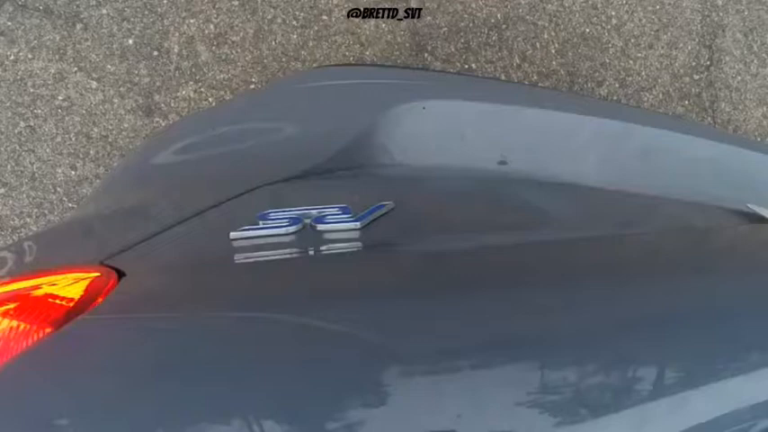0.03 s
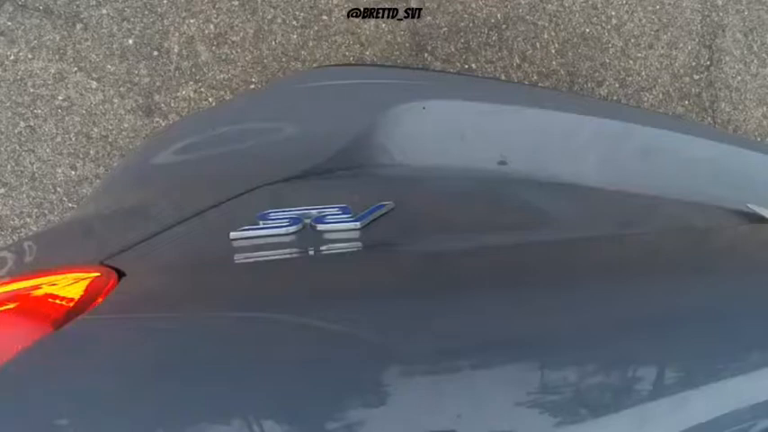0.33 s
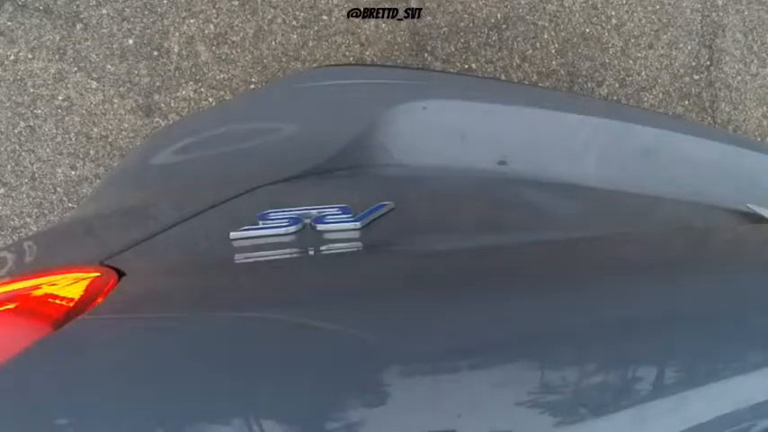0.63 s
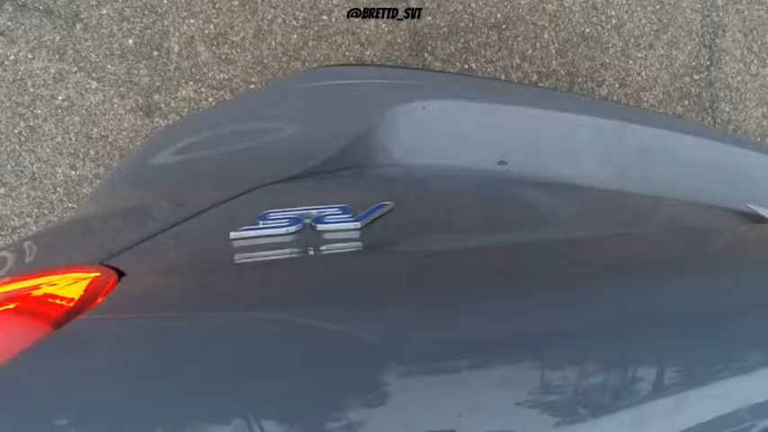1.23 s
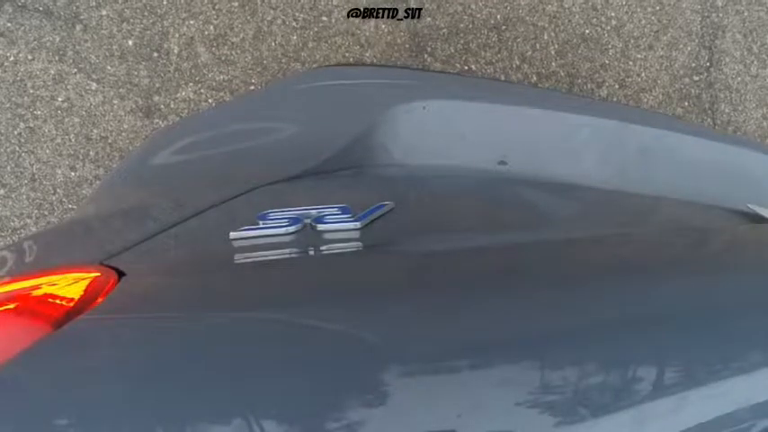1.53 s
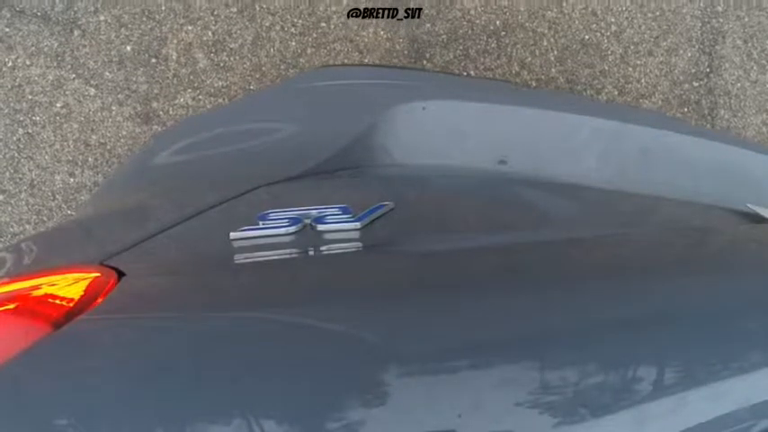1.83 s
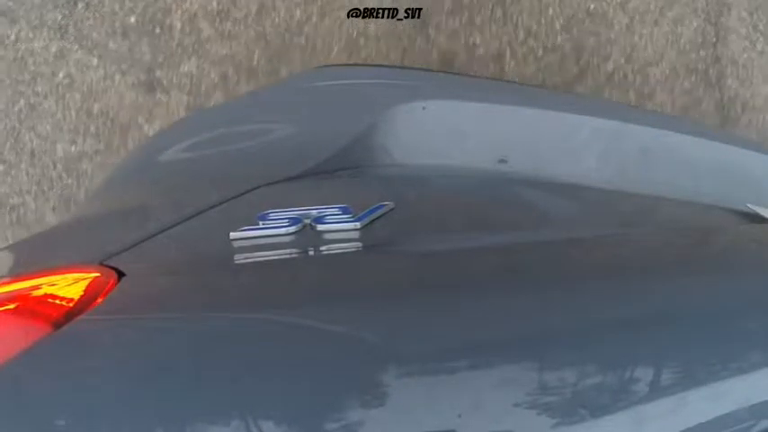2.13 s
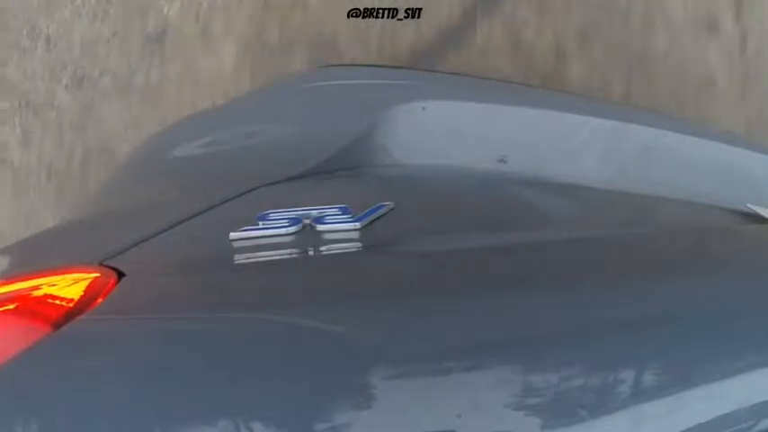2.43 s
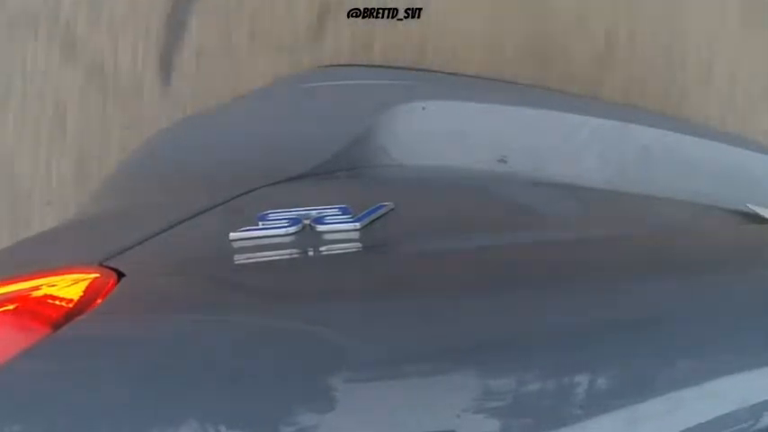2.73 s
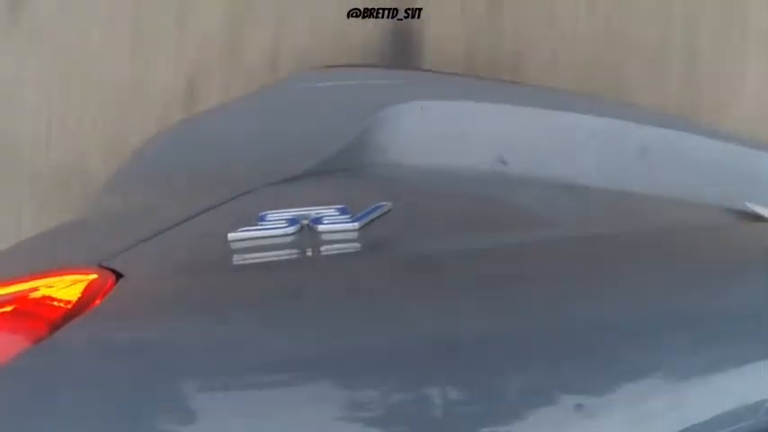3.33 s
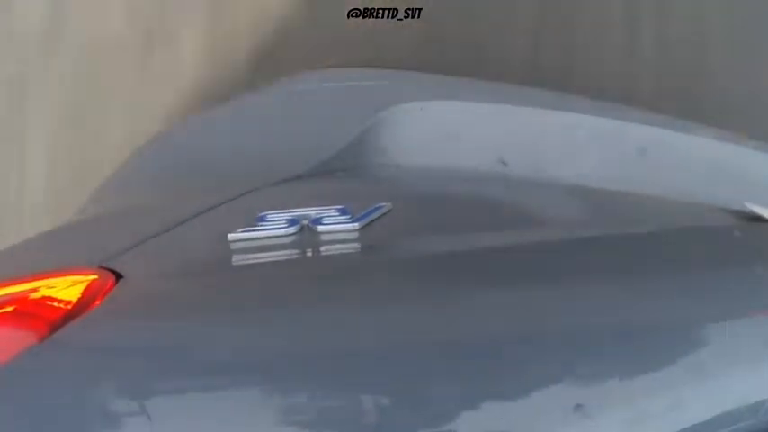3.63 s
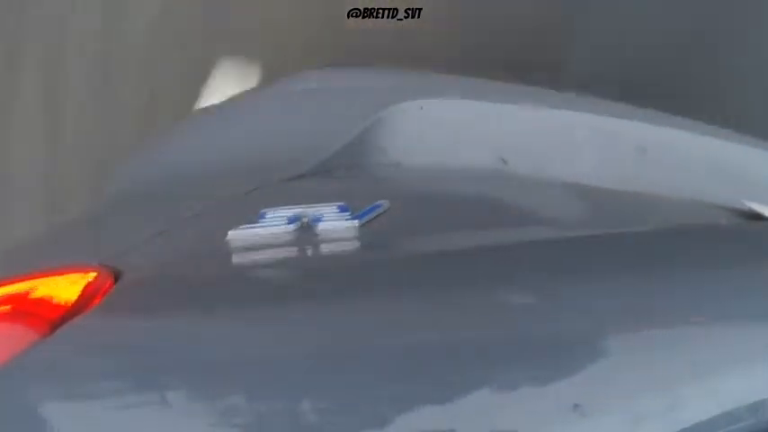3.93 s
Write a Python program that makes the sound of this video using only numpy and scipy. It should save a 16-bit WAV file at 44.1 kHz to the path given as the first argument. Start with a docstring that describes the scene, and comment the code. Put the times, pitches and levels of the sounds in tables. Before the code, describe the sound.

A sports car's V8 idles with a lumpy rumble and a faint whirr. Two throttle blips and a loud exhaust pop follow, then the car pulls away with a rising drone. The microphone rides just above the exhaust.

```python
"""A lumpy V8 idle, close up: the microphone rides on a sports car's rear wing, just above the exhaust.
Two throttle blips and a pop follow, then the clutch bites, the revs sag and the car pulls away over grit.
Each beat of the near cylinder bank pushes a deep boom out of the pipe and, under throttle, rings it
with a bark. Gas rasps and hisses, unburnt fuel pops, and behind it all the engine bay whirrs at idle.
Thin overload ticks stand for the loudest beats clipping the microphone."""
import sys
import numpy as np
from scipy import signal
from scipy.fft import rfft, irfft
from scipy.io import wavfile
from scipy.ndimage import uniform_filter1d, minimum_filter1d

SR = 44100
rng = np.random.default_rng(int(sys.argv[2]) if len(sys.argv) > 2 else 0)


def store_pcm(level_fs):
    """Save levels as 16-bit WAV."""
    pcm = np.round(np.clip(level_fs, -1, 1) * 32767).astype(np.int16)
    wavfile.write(sys.argv[1], SR, np.atleast_2d(pcm).T)


N = 176400

# engine speed as the beat rate of the bank nearest the microphone: t/s, rate/Hz
BEAT_RATE = [(0.0, 20.86), (0.3, 28.3), (0.88, 29.46), (1.07, 45.65), (1.15, 58.07), (1.29, 47.7),
             (1.46, 81.4), (1.68, 74.84), (1.86, 64.82), (1.99, 78.52), (2.1, 72.46), (2.28, 77.44),
             (2.52, 72.88), (2.87, 53.96), (3.22, 81.79), (3.46, 94.56), (3.82, 126.5), (4.0, 143.49)]
# whirr of the engine bay, pump whine, grit under the tyres: t/s, level/dB
BAY_LEVEL = [(.13,-29.5),(.5,-30.5),(.9,-35),(1.2,-49),(1.7,-53.5),(2.5,-57),(4,-58)]
WHINE_LEVEL = [(.13,-37),(.9,-32),(1.2,-41.5),(1.75,-40),(2.1,-41.5),(2.6,-50),(4,-53.5)]
GRIT_LEVEL = [(2.1,-96),(2.25,-63),(2.8,-55),(3.1,-62),(3.7,-63),(4,-64)]
# thin overload ticks as the loudest beats clip the microphone: t/s, level/dB
OVERLOAD_LEVEL = [(.13,-79),(.95,-72),(1.04,-52),(1.11,-49.5),(1.17,-102),(2.1,-82),(2.22,-70),(2.6,-67),(2.78,-56),(2.92,-75),(3.5,-89),(3.95,-75)]
# partials of the pump whine: f/Hz, relative level/dB
WHINE_PARTIALS = [(5850,-44),(8781,-43.5),(11712,-40),(14625,-47)]
# tone colours of engine bay, overload ticks and grit, hiss, rasp and pipe: f/Hz, relative level/dB
BAY_COLOUR = [(150,-8.5),(330,-11),(470,-10.5),(650,-9),(820,-6),(940,0.5),(1130,-6),(1500,-18),(1850,-16),(2400,-21),(3200,-28),(4200,-38),(6000,-44.5),(9000,-50),(15000,-62)]
TICK_COLOUR = [(500,-7.5),(2000,2),(4000,-5),(7000,-14),(11000,-22.5),(15000,-31)]
HISS_COLOUR = [(300,-7.5),(1000,9),(1550,-4),(1950,-0.5),(2400,-8.5),(2750,-13.5),(3350,-8.5),(3800,-17.5),(4060,-12),(4600,-24.5),(5600,-21),(6600,-24.5),(8000,-29),(11000,-38),(15000,-49.5)]
RASP_COLOUR = [(100,-30.5),(250,-10.5),(345,-14),(450,-4),(640,-4),(730,-5),(870,-2),(1020,-1.5),(1110,-10.5),(1200,-12.5),(1380,-16),(1560,-27.5),(1900,-29),(2750,-46.5),(3400,-42),(5000,-56),(12000,-79)]
PIPE_COLOUR = [(100,-16.5),(180,-14),(260,-12),(340,-13.5),(405,5.5),(540,2),(630,0),(730,3),(860,3.5),(980,2),(1120,-4.5),(1240,-4),(1380,-12),(1540,-36.5),(1950,-28.5),(2300,-34.5),(2750,-53.5),(3400,-43),(5000,-65.5),(12000,-77.5)]
# hiss, rasp, rumble, bark and boom at the tailpipe: t/s, level/dB (each on its own scale)
HISS_LEVEL = [(.13,-72),(.9,-57),(1.05,-48),(1.2,-62),(1.3,-59),(1.45,-47.5),(1.6,-60),(1.84,-58),(1.97,-48),(2.07,-53),(2.25,-44.5),(2.9,-51.5),(3.3,-47.5),(3.44,-49.5),(3.7,-45),(4,-33.5)]
RASP_LEVEL = [(.13,-52),(.9,-43.5),(1.05,-33),(1.25,-44),(1.45,-25),(1.62,-42.5),(1.82,-43.5),(1.95,-25.5),(2.4,-24.5),(2.88,-31.5),(3.2,-23),(3.43,-24.5),(3.75,-15.5),(4,-11.5)]
RUMBLE_LEVEL = [(.13,-38),(.86,-36),(1.0,-22),(1.3,-28),(1.55,-22),(1.8,-30),(3.3,-29),(3.55,-24),(4,-28)]
BARK_LEVEL = [(.13,-55),(.88,-71),(.96,-24),(1.14,-30.5),(1.18,-38.5),(1.28,-48),(1.34,-27),(1.45,-19),(1.49,-15.5),(1.52,-56),(1.62,-48.5),(1.86,-50.5),(1.915,-22.5),(1.99,-15.5),(2.06,-29.5),(2.16,-18),(2.42,-22.5),(2.88,-32),(3.2,-22),(3.36,-19.5),(3.42,-28.5),(3.55,-14),(3.75,-14.5),(4,-16)]
BOOM_LEVEL = [(.13,-16),(.9,-14),(.94,-9.5),(.97,0.5),(1.03,-2.5),(1.14,-6.5),(1.18,-25),(1.22,-13),(1.27,-26.5),(1.33,-9),(1.48,-11),(1.52,-10.5),(1.61,-24.5),(1.73,-22.5),(1.84,-17),(1.97,-7),(2.06,-14),(2.16,-6),(2.8,-9),(3.3,-11),(3.37,-11),(3.41,-19),(3.5,-10.5),(3.75,-16.5),(4,-17.5)]
# fuel lighting in the pipe: t/s, thump f/Hz, thump level/dB, bark level/dB, crack level/dB
POPS = [(.668,60,-39,-23.5,-30),(0.854,60,-36,-25,-25),(1.514,42,2.5,-25,-71),(1.555,42.6,5,-14,-18),(1.562,110,-5,-25,-21.5),(1.657,45.2,-5.5,-37,-62),(2.22,80,-41,-28,-32),(2.55,80,-39,-16,-24),(3.384,91.8,1,-24,-19.5),(3.628,92,-24,-22,-18)]
# the four beats of one engine cycle at full lumpiness: relative level/dB
CYLINDERS = [-9, 0, -8, -1]
# how fully the cylinders differ: t/s, share
LUMPINESS = [(1.15,.2),(1.3,1),(2.15,1),(2.45,.45),(3,.4),(3.4,.75),(4,.65)]
# the pipe's bright ring at high revs and its throaty ring at middling revs: beat rate/Hz, gain/dB
BRIGHT_RING = [(75,-32),(128,4.5)]
THROAT_RING = [(55,-14),(72,-4.5),(95,-17)]
# reflections reaching the microphone from road and bodywork: delay/s, level/dB
ECHOES = [(.0016,-12.5),(.0058,-19)]
# boom waveform: beat rate/Hz, slope/(dB per octave), half-rate throb/dB, lag per overtone/cycles
BOOM_SHAPE = [(29,-8.5,-47,0.091),(42.8,-9.5,-25,0.14),(52,-16,-18,0.044),(55.56,-10.5,-17,0.079),(78.7,-12,-12.5,0.12),(93,-9.5,-1,0.17),(129,-8.5,-4,0.16)]
# cut or boost of the harmonics at the pipe's drone, growing with load: t/s, gain/dB
DRONE_GAIN = [(.13,-11),(.9,-21.5),(1.05,-0.5),(2,-10.5),(2.5,4),(3.3,6),(4,10)]

TIME = np.arange(N) / SR
BEAT_LEAD_S = .00041  # bark and puffs start this far ahead of the overload ticks


def undb(db):
    """Decibels to gain."""
    return 10 ** (np.asarray(db) / 20)


def unit(x):
    """Scale to rms 1."""
    return x / np.sqrt(np.mean(x ** 2))


def curve(rows, at=TIME):
    """Join two-column rows by straight lines, by default over time."""
    return np.interp(at, *np.array(rows).T)


def walk(rate_hz):
    """Slow random drift with rms near 1."""
    hold = int(SR / rate_hz)
    steps = np.repeat(rng.standard_normal(N // hold + 1), hold)
    return unit(uniform_filter1d(uniform_filter1d(steps, hold), hold)[:N])


def colour(x, points, size=4096):
    """Ring x through a causal filter of unit energy shaped by the points (f/Hz, level/dB)."""
    hz, db = np.array(points).T
    bin_hz = np.arange(size // 2 + 1) * SR / size
    gain = undb(np.interp(np.log(bin_hz + 1), np.log(hz), db))
    cepstrum = irfft(np.log(gain))
    cepstrum[1:size // 2] *= 2  # fold to minimum phase
    cepstrum[size // 2 + 1:] = 0
    ring = irfft(np.exp(rfft(cepstrum)))
    return signal.fftconvolve(x, ring / np.linalg.norm(ring))[:N]


def resonance(x, hz, width_hz):
    """Ring x through one resonant peak."""
    return signal.lfilter(*signal.iirpeak(hz, hz / width_hz, fs=SR), x)


def clicks(times, sizes):
    """Impulses at the given times, each shared between two samples."""
    at = np.clip(times * SR, 0, N - 2)
    i, part = at.astype(int), at % 1
    return np.bincount(i, sizes * (1 - part), N) + np.bincount(i + 1, sizes * part, N)


def tyre_grit(count=260, spread_db=8):
    """Down on the road, grit snaps under the tyres at random, a few grains much louder than the rest."""
    when, chance = rng.random((count, 2)).T
    sizes = undb(-spread_db * np.log(np.maximum(chance, .03)))
    grains = unit(clicks(when * N / SR, sizes))
    return colour(grains * undb(curve(GRIT_LEVEL)), TICK_COLOUR)


def overload_ticks(times, sizes):
    """Thin ticks on the beats, at a set level over time: the sound of the microphone clipping."""
    ticks = unit(clicks(times + BEAT_LEAD_S, sizes))
    return colour(ticks * undb(curve(OVERLOAD_LEVEL)), TICK_COLOUR)


def engine_bay(phase, pulsing=.11, flicker_db=2.4):
    """Further off, belts and valves whirr, pulsing as both banks fire, with a faint pump whine."""
    firing = 1 + pulsing * np.cos(2 * np.pi * 2 * phase)
    whirr = colour(rng.standard_normal(N) * firing, BAY_COLOUR) * undb(flicker_db * walk(25))
    pump_time = TIME + np.cumsum(.00022 * walk(12)) / SR
    whine = sum(undb(db) * np.sqrt(2) * np.sin(2 * np.pi * hz * pump_time) for hz, db in WHINE_PARTIALS)
    return whirr * undb(curve(BAY_LEVEL)) + whine * undb(curve(WHINE_LEVEL))


def near_bank_beats(phase, jitter_s=.00006, scatter_db=1.7, tick_scatter_db=7):
    """The near bank fires strong and weak beats in turn: their times, sizes and overload tick sizes."""
    beat = np.arange(int(phase[-1]) + 1)
    jitter, scatter, tick_scatter = rng.standard_normal((400, 3))[beat].T
    times = np.interp(beat, phase, TIME) - BEAT_LEAD_S + jitter_s * jitter
    cylinder_db = np.array(CYLINDERS)[beat % len(CYLINDERS)] * curve(LUMPINESS, times)
    sizes = unit(undb(cylinder_db + scatter_db * scatter))
    return times, sizes, undb(tick_scatter_db * np.tanh(tick_scatter))


def gas_rumble(low_hz=23, high_hz=92):
    """The gas stream rumbles low beneath the microphone."""
    band = signal.butter(2, [low_hz, high_hz], "band", fs=SR, output="sos")
    return unit(signal.sosfilt(band, rng.standard_normal(N))) * undb(curve(RUMBLE_LEVEL))


def gas_puffs(beat_hz, times, sizes, hiss_boost_db=5.5):
    """Each beat sends a puff of rasping, hissing gas out of the tailpipe, on top of a steady flow."""
    last = np.maximum(np.searchsorted(times, TIME) - 1, 0)
    age_beats = np.maximum(TIME - times[last], 0) * beat_hz

    def puffs(decay_beats, steady):
        envelope = sizes[last] * np.exp(-age_beats / decay_beats) + steady
        return unit(envelope * rng.standard_normal(N))

    rasp = puffs(decay_beats=.74, steady=.16) * undb(curve(RASP_LEVEL))
    hiss = puffs(decay_beats=.65, steady=.6) * undb(curve(HISS_LEVEL) + hiss_boost_db)
    return colour(rasp, RASP_COLOUR) + colour(hiss, HISS_COLOUR)


def fuel_pops(thump_delay_s=.0037, thump_decay_s=.011):
    """Unburnt fuel lights in the pipe: a crack, a short bark and a low thump."""
    def burst(age, decay_s):
        return (age > 0) * np.exp(-age / decay_s) * rng.standard_normal(N)

    out = np.zeros(N)
    for start, hz, thump_db, bark_db, crack_db in POPS:
        age = np.maximum(TIME - start, 0)
        thump_age = np.maximum(age - thump_delay_s, 0)
        thump = np.sin(2 * np.pi * hz * thump_age) * np.exp(-thump_age / thump_decay_s)
        bark = colour(burst(age, decay_s=.012), PIPE_COLOUR)
        crack = colour(burst(age, decay_s=.0014), HISS_COLOUR)
        out += undb(thump_db) * thump + undb(bark_db) * bark + undb(crack_db) * crack
    return out


def pipe_bark(beat_hz, times, sizes):
    """Under throttle the beats ring the pipe; the bark arrives direct and off road and bodywork."""
    kicks = clicks(times, sizes) * np.sqrt(SR / beat_hz)  # same power at any beat rate
    bark = colour(kicks * undb(curve(BARK_LEVEL)), PIPE_COLOUR)
    bright = resonance(bark, hz=910, width_hz=160) * undb(curve(BRIGHT_RING, beat_hz))
    throat = resonance(bark, hz=685, width_hz=170) * undb(curve(THROAT_RING, beat_hz))
    direct = bark + bright + throat
    return direct + sum(undb(db) * np.interp(TIME - delay, TIME, direct) for delay, db in ECHOES)


def pipe_boom(beat_hz, phase, drone_hz=246, drone_width_hz=110, wander_db=.4):
    """Right below the microphone, each beat's deep pressure wave, with a drone and a half-rate throb."""
    rates, *columns = np.array(BOOM_SHAPE).T
    slope, throb_db, lag = (np.interp(beat_hz, rates, column) for column in columns)
    wave = undb(throb_db) * np.cos(np.pi * phase)
    for k in range(1, 9):
        detuning = 2 * (k * beat_hz - drone_hz) / drone_width_hz
        harmonic_db = slope * np.log2(k) + curve(DRONE_GAIN) / (1 + detuning ** 2)
        wave -= undb(harmonic_db) * np.cos(2 * np.pi * (k * phase - (k - 1) * lag))
    return np.sqrt(2) * wave * undb(curve(BOOM_LEVEL) + wander_db * walk(30))


def scene():
    """Mono, from the rear wing: one engine speed drives exhaust and engine bay; pops and grit join in."""
    beat_hz = curve(BEAT_RATE)
    phase = np.cumsum(beat_hz) / SR - .06  # counted in beats
    low_end = gas_rumble() + pipe_boom(beat_hz, phase)
    times, sizes, tick_sizes = near_bank_beats(phase)
    exhaust = low_end + gas_puffs(beat_hz, times, sizes) + fuel_pops() + pipe_bark(beat_hz, times, sizes)
    return (exhaust + engine_bay(phase) + tyre_grit() + overload_ticks(times, tick_sizes))[None]


def record(dry, start_s=.12, ceiling=1.0, limiter_s=.001, top_hz=16000):
    """The sound begins after a moment of silence; a fast limiter holds peaks and the top is cut."""
    size = int(limiter_s * SR)
    gain = minimum_filter1d(ceiling / np.maximum(np.abs(dry), ceiling), 2 * size)
    smooth_gain = uniform_filter1d(uniform_filter1d(gain, size), size)
    live = dry * smooth_gain * (TIME >= start_s)
    return signal.sosfilt(signal.ellip(8, .2, 70, top_hz, fs=SR, output="sos"), live)


dry = scene()
out = record(dry)
store_pcm(out)
```